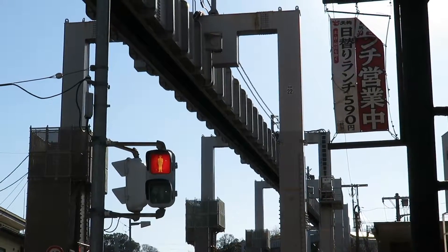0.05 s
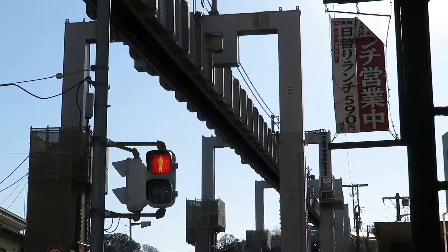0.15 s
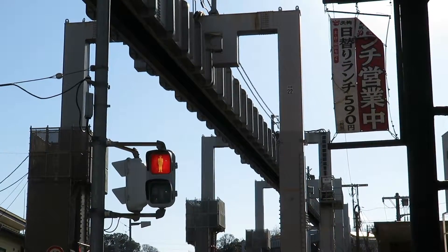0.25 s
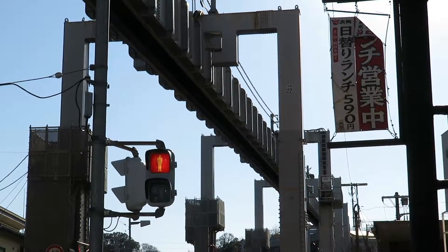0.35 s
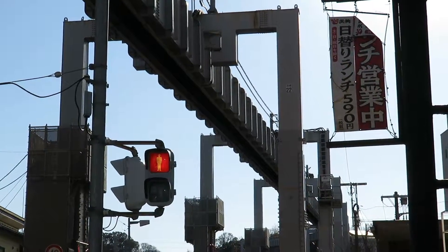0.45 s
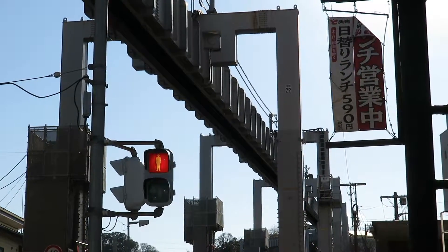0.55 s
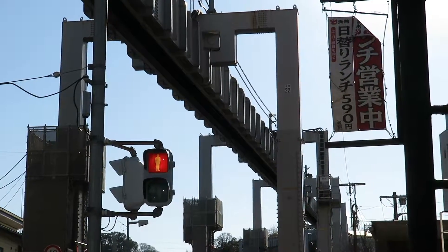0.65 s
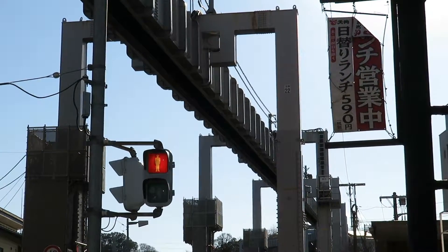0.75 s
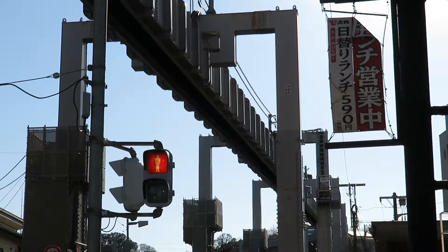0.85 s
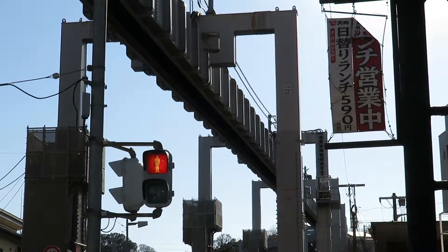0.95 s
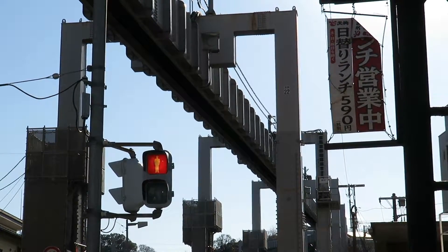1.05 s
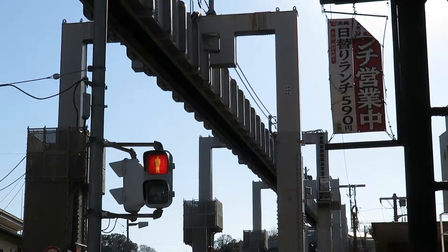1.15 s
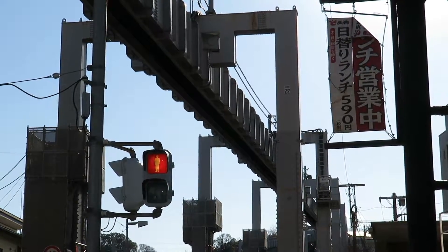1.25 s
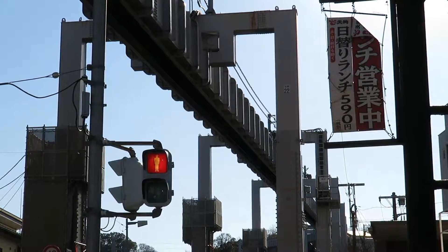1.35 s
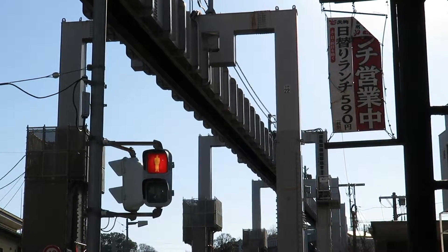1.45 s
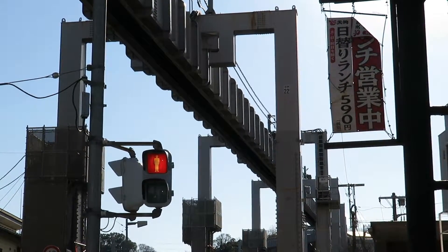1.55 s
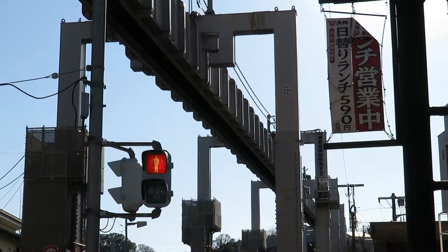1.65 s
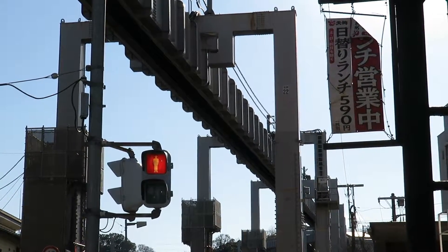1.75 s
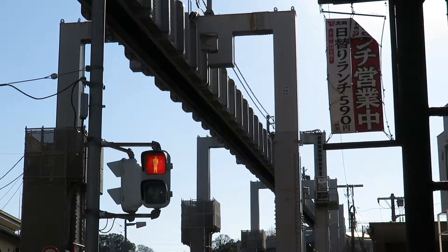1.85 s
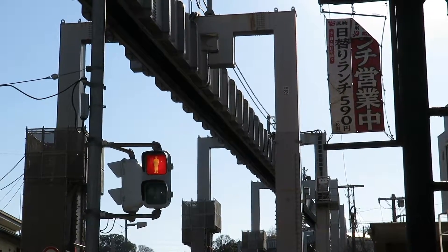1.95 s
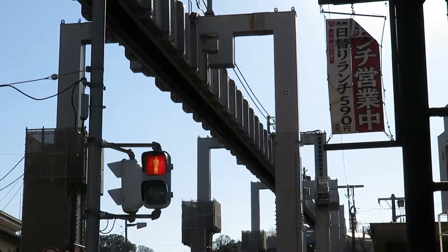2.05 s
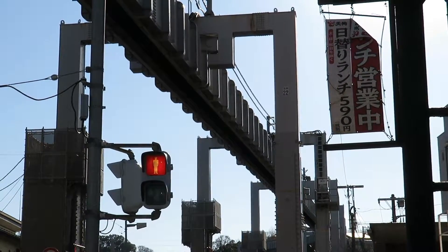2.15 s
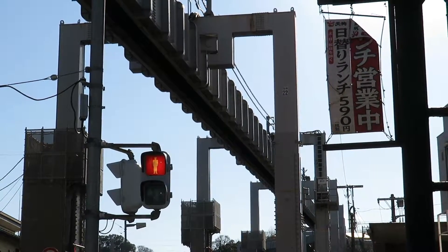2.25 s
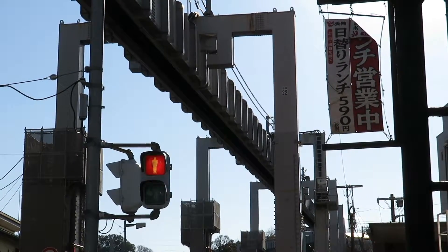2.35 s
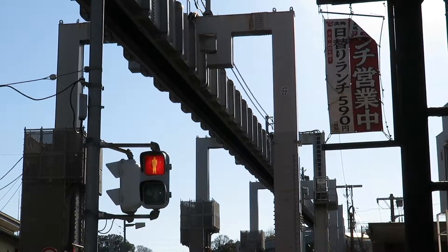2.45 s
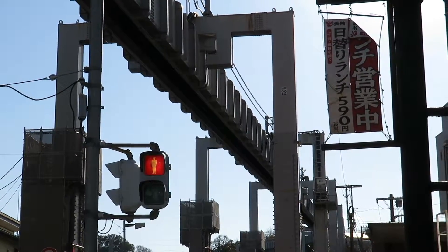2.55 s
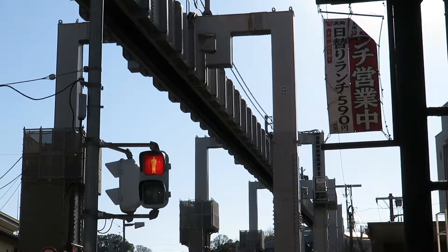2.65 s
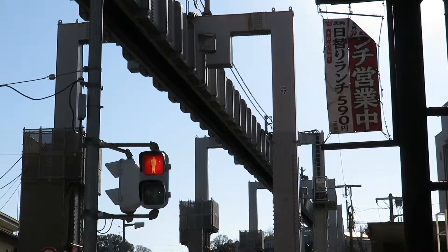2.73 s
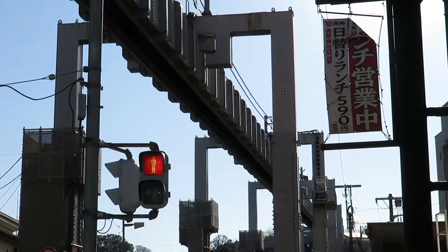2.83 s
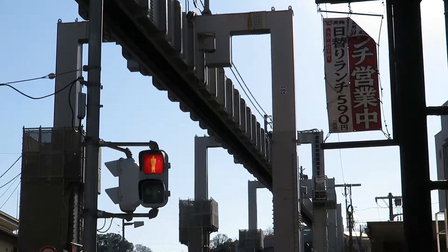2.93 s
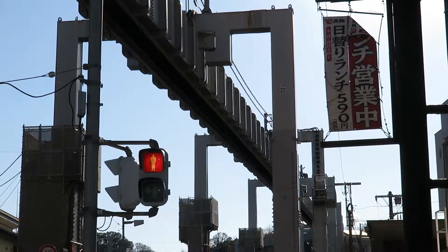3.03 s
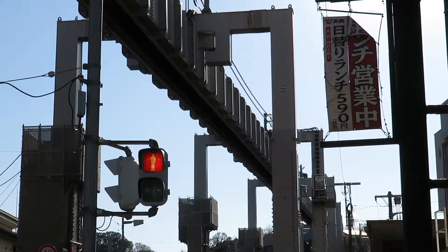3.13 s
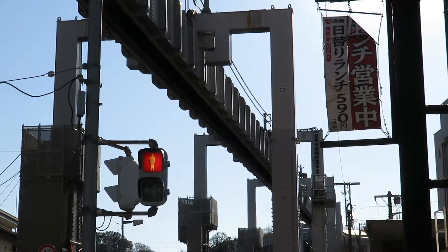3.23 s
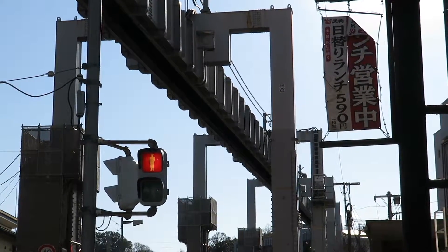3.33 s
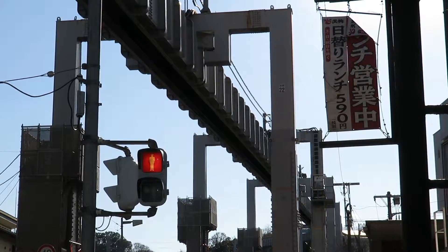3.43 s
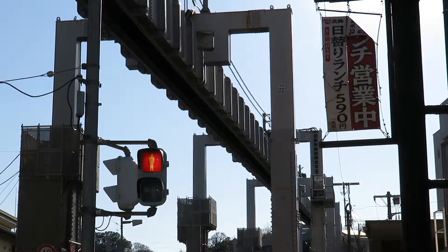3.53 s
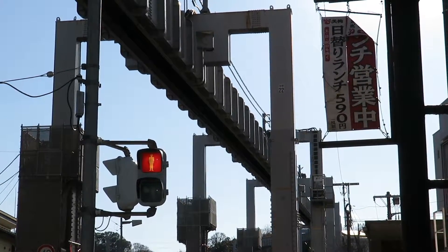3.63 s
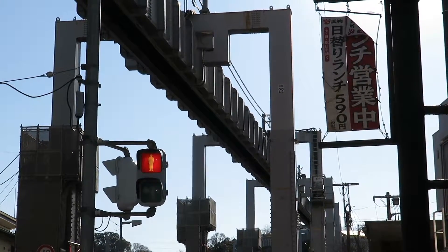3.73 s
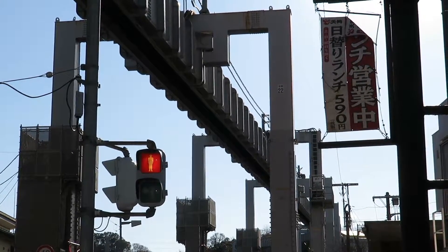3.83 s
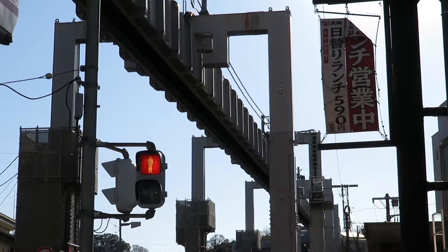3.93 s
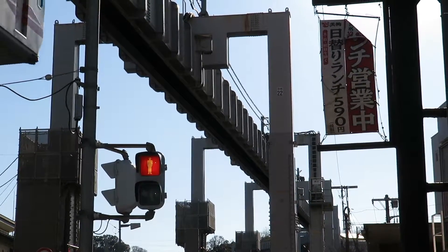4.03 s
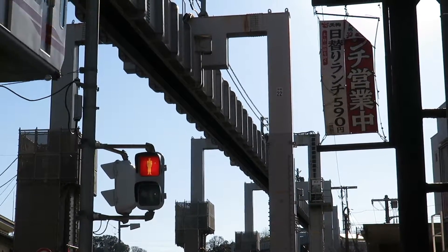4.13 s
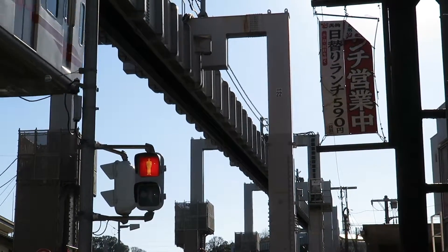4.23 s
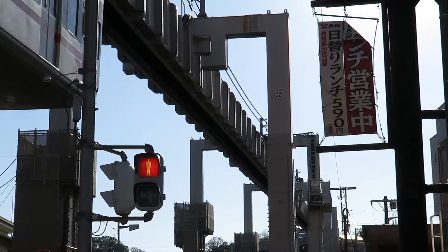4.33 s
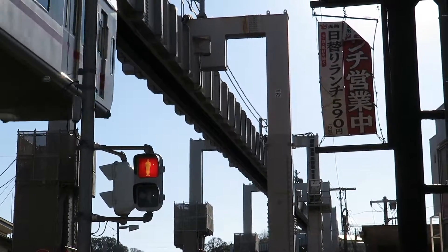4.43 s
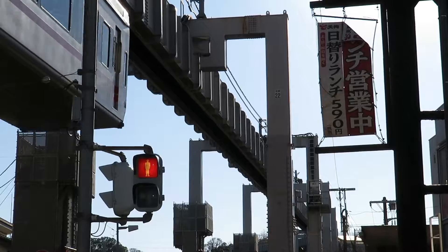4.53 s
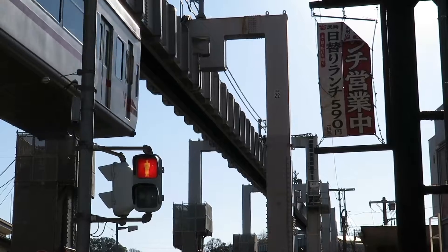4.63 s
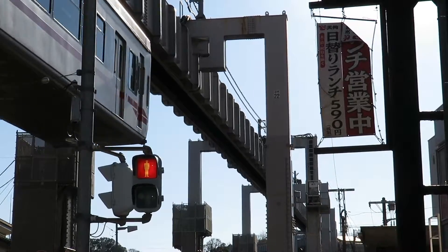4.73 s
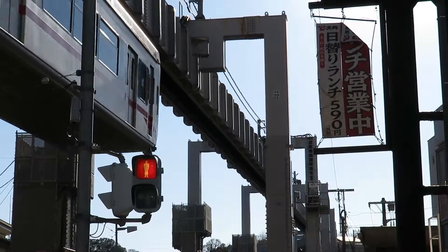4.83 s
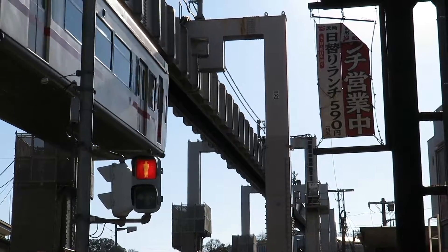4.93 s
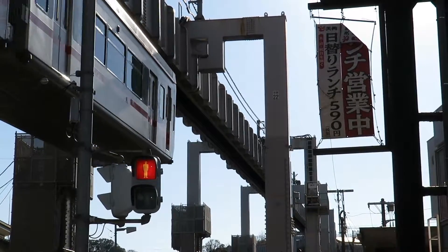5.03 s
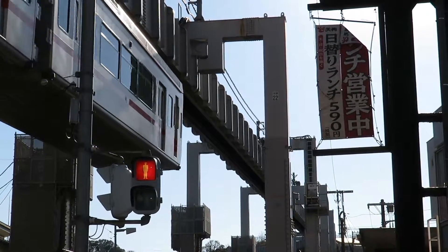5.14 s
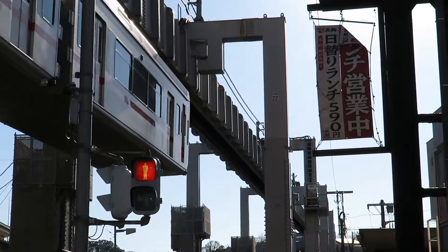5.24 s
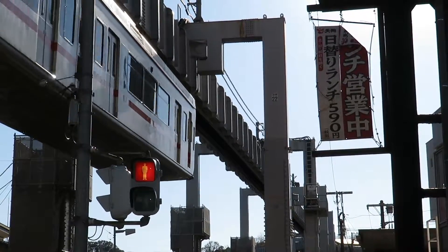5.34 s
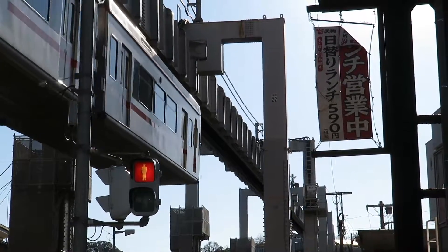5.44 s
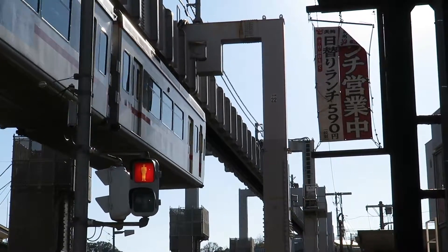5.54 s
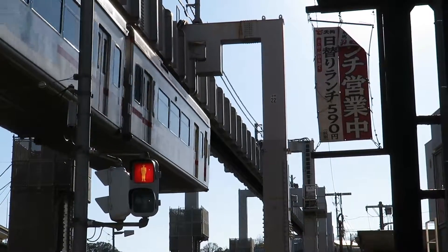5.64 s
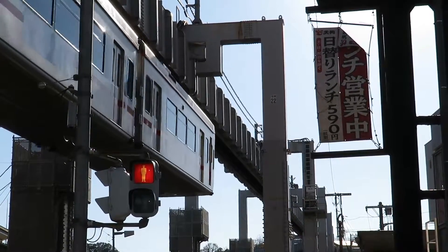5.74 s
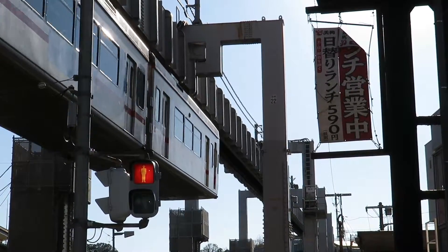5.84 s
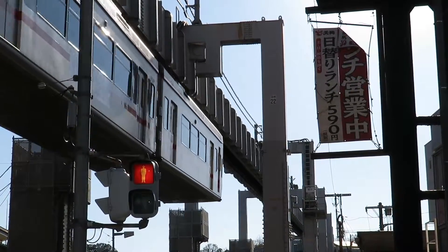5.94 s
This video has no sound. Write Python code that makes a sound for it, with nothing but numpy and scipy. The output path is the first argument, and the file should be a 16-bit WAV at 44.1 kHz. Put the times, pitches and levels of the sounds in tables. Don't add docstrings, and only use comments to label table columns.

```python
import sys
import numpy as np
from scipy import signal
from scipy.fft import rfft, irfft, next_fast_len
from scipy.io import wavfile
from scipy.ndimage import uniform_filter1d, map_coordinates

SR = 44100
rng = np.random.default_rng(int(sys.argv[2]) if len(sys.argv) > 2 else 0)


def to_linear_factor(level_db):
    exponent = np.asarray(level_db, float) / 20
    return 10 ** exponent


def generate_wav(sig):
    pcm = np.round(np.clip(np.atleast_2d(sig).T, -1, 1) * 32767).astype(np.int16)
    wavfile.write(sys.argv[1], SR, pcm)


N = 263718

# [t/s, level/dB]
NEARNESS = [(0, -25.5), (.3, -22.5), (.66, -19), (1.2, -13.5), (1.7, -7), (2.25, -0.5), (2.6, -.5),
            (2.9, 0.5), (3.2, -1), (3.5, 1), (4.0, -1), (4.5, 0.5), (4.8, 0.5), (5.3, 0.5), (5.6, 0),
            (5.98, -1.5)]
# [t/s, share 0-1]
PASSING = [
    (0, 0.14),
    (2.4, 0.09),
    (2.9, 0.44),
    (3.3, 0.57),
    (3.8, 0.62),
    (4.5, .55),
    (5, 0.65),
    (5.5, 0.97),
    (5.98, 1),
]
# [f/Hz, level/dB per Hz]
FIZZ = [(5500, -18), (8000, -3), (9500, 10), (12400, 2), (13400, 0), (14100, -10), (14400, -60)]
# [f/Hz, level/dB per Hz]
SIZZLE_ACROSS = [(4000, -24.5), (5500, -7), (6500, -3), (9000, -1), (10300, -7), (12000, -30)]


def unit(x):
    return x / np.sqrt(np.mean(x ** 2) + 1e-20)


def along(points, hz):
    f, v = np.transpose(points)
    return np.interp(np.log(hz + 1), np.log(f + 1), v)


def curve(rows):
    s, value = np.transpose(rows)
    return np.interp(np.arange(N) / SR, s, value)


def follow(law):
    held_db, grows, gone_db = law
    return held_db + grows * curve(NEARNESS) + gone_db * curve(PASSING)


def wobble(rate):
    knots = rng.standard_normal(int(N * rate / SR) + 4)
    return map_coordinates(knots, [np.arange(N) * rate / SR])


def filtered(x, response):
    m = next_fast_len(N + 8192)
    return irfft(rfft(x, m) * response(np.fft.rfftfreq(m, 1 / SR)), m)[:N]


def coloured(x, spectrum):
    return unit(filtered(x, lambda hz: to_linear_factor(along(spectrum, hz))))


def ringing(x, modes):
    def response(hz):
        power = 0
        for centre, width, db in modes:
            damping = 1j * hz * 1.37 * width
            one = damping / (centre ** 2 - hz ** 2 + damping)
            power = power + to_linear_factor(2 * db) * abs(one) ** 4
        return np.sqrt(power)
    return unit(filtered(x, response))


def patchy(patchy_db):
    z = signal.stft(rng.standard_normal(N + 512), nperseg=512)[2]
    field = uniform_filter1d(rng.standard_normal(z.shape), size=6, axis=0)
    field = uniform_filter1d(field, size=10, axis=1)
    return unit(signal.istft(z * to_linear_factor(patchy_db * unit(field)), nperseg=512)[1][:N])


def train():
    air, slap_db = patchy(patchy_db=1.12), slaps()
    flutter_db = 0.84 * wobble(23)
    body = dulled_treble(beam_drone(air) + tyre_roar(air) + tread_song(air, slap_db))
    tread_db = follow((-32.5, 1.21, -5)) + slap_db + flutter_db
    across_db = 0.37 * slap_db + flutter_db - 0.2
    duck = to_linear_factor(-0.11 * uniform_filter1d(gusts(), size=4000))
    total = duck * (body + to_linear_factor(tread_db) * tread_hiss(air, slap_db))
    return total, duck ** .4 * to_linear_factor(across_db) * port_difference(air)


def beam_drone(air):
    # [f/Hz, width/Hz, level/dB]
    beam_modes = [(555, 250, 0.5), (685, 480, -6.5)]
    # [f/Hz, width/Hz, level/dB]
    low_beam_modes = [(334, 197, 0), (415, 140, -2.5)]
    boom_db = follow((-7.5, -0.09, 7.2))
    drone = ringing(air, beam_modes) + to_linear_factor(boom_db) * ringing(air, low_beam_modes)
    return to_linear_factor(follow((-22, 1.164, 0.1)) - 2.28) * drone


def tyre_roar(air):
    # [f/Hz, width/Hz, level/dB]
    tyre_modes = [(843, 190, 0.5), (1042, 260, 1.5)]
    # [t/s, swell/dB]
    bogies = [(1.45, 1), (1.95, 0), (2.3, -2.5), (2.91, 3), (3.45, 2.5), (3.7, 3.5), (3.9, 1), (4.33, -2.5),
              (4.55, 3), (5.33, 4), (5.85, 3.5)]
    half_width_s = 0.033
    t = np.arange(N) / SR
    swell_db = sum(db * np.exp(-((t - s) / half_width_s) ** 2) for s, db in bogies)
    return to_linear_factor(follow((-19.5, 0.86, -1)) + swell_db - 4.5) * ringing(air, tyre_modes)


def tread_song(air, slap_db):
    # [f/Hz, width/Hz, level/dB]
    song_modes = [(1530, 483, 1), (1798, 480, -2)]
    song_db = follow((-24, 1.04, -0.39)) - 1.96 + 0.11 * slap_db
    return to_linear_factor(song_db) * ringing(air, song_modes)


def tread_hiss(air, slap_db):
    # [f/Hz, level/dB per Hz]
    hiss_spectrum = [(1200, -30), (2200, 1), (3000, -3.5), (4100, -8.5), (5500, -12), (7000, -20.5),
                     (8900, -18), (9800, -52), (12000, -94)]
    # [f/Hz, width/Hz, level/dB]
    whine = (4500, 7.6, -27)
    t = np.arange(N) / SR
    fizz_db = follow((-28.5, 1, 9.7)) + 0.2 * slap_db + 0.63 * wobble(8.0)
    for s, rise_db in ((4.24, 6), (6.1, 3)):
        fizz_db = fizz_db + rise_db * (1 + np.tanh((t - s) / 0.065)) / 2
    hiss = to_linear_factor(-2.0) * dulled_treble(coloured(air, hiss_spectrum))
    return hiss + to_linear_factor(whine[2]) * ringing(air, [whine]) + to_linear_factor(fizz_db) * coloured(air, FIZZ)


def slaps():
    # [t/s, rise of the hiss/dB]
    joints = [(.23, 3), (.34, 6), (.81, 10), (.92, 5), (1.15, 10.5), (1.48, 5), (1.72, 1), (2.1, 5),
              (2.27, -0.5), (2.43, 5.5), (2.61, 10.5), (3.02, 6), (3.5, 6), (3.93, 6.5), (4.17, 5.5),
              (4.45, -0.5), (4.7, 2.5), (5.18, 4), (5.31, 1), (5.46, 7.5), (5.81, 8)]
    dying_s = 0.053
    t = np.arange(N) / SR
    slap_db = np.zeros(N)
    for s, db in joints:
        age = np.clip(t - s, 0, None) / dying_s
        slap_db += db * 1.75 * (1 - np.exp(-5 * age)) * np.exp(-1.5 * age)
    return slap_db


def dulled_treble(x):
    # [f/Hz, level/dB]
    treble_loss = [(3000, 0.5), (6500, 0.5), (8400, -3.5), (9800, -19)]
    near = np.clip(-2.5 + curve(NEARNESS) / 18, 0, 1)
    return near * x + (1 - near) * filtered(x, lambda hz: to_linear_factor(along(treble_loss, hz)))


def port_difference(air):
    # [f/Hz, level/dB per Hz]
    coming = [(900, -53), (1350, -13), (1800, -3), (2600, -2), (3800, 0.5), (4800, -5), (6000, -14),
              (8000, -33)]
    # [f/Hz, level/dB per Hz]
    leaving = [(900, -37), (1350, -11), (1800, -1), (3000, 0), (4400, -5.5), (6000, -14), (8000, -35)]
    # [f/Hz, level/dB per Hz]
    fizz_across = [(9000, -32), (10800, -6), (12600, 2), (14100, -5), (15000, -11), (15800, -26),
                   (17000, -60)]
    # [f/Hz, share 0-1]
    one_way = [(1200, .4), (2200, 1), (3500, 0.86), (7000, 0.96), (9000, .4), (12000, .1)]
    # [f/Hz, turn/radians]
    port_turn = [(1400, 3.6), (3500, 2.8), (6000, 2.2), (10000, 2.1)]
    t, past = np.arange(N) / SR, curve(PASSING)
    direct = filtered(air, lambda hz: along(one_way, hz) * np.exp(1j * along(port_turn, hz)))
    share = 0.9 + (0.32 - 0.9) * past
    arriving = share * direct + np.sqrt(1 - 0.86 * share ** 2) * patchy(patchy_db=1.7)
    abeam_db = 3.5 * np.exp(-((t - 3.73) / 0.34) ** 2)
    hiss = (1 - past) * coloured(arriving, coming) + past * coloured(arriving, leaving)
    sizzle = to_linear_factor(.6 * abeam_db) * coloured(arriving, SIZZLE_ACROSS)
    fizz = to_linear_factor(abeam_db) * coloured(arriving, fizz_across)
    layers = (hiss, (-36.5, 1.07, -1.6)), (sizzle, (-41.5, 1.14, -4)), (fizz, (-42.5, 1.26, -6.5))
    return sum(to_linear_factor(follow(law) + 0.91 * wobble(9)) * layer for layer, law in layers)


def ticks(rows, t60, spectrum):
    t = np.arange(N) / SR
    shape = sum(to_linear_factor(db - 60 * np.clip(t - s, 0, None) / t60) * (t >= s) for s, db in rows)
    return shape * coloured(rng.standard_normal(N), spectrum)


def wind():
    # [f/Hz, level/dB per Hz]
    buffet = [(20, -46), (40, -19.5), (70, -12), (130, -5), (220, -3.5), (310, -2.5), (430, -5), (600, -26),
              (1200, -83)]
    # [t/s, peak level/dB]
    pops = [(.28, -22.5), (0.329, -23), (.59, -23), (0.834, -17), (0.879, -20), (.98, -18.5), (1.003, -29),
            (1.05, -30), (1.096, -25), (3.624, -8), (4.003, -6), (4.14, -9), (4.209, -5), (4.279, -17),
            (5.637, -16), (5.742, -18), (5.869, -14)]
    lump_db = 0.46 * wobble(30) + 0.81 * wobble(16)
    lumps = unit(to_linear_factor(lump_db) * coloured(rng.standard_normal(N), buffet))
    eddies = np.zeros(N)
    for s, db in pops:
        eddies[round(s * SR)] = to_linear_factor(db)
    thump = lambda hz: to_linear_factor(along(buffet, hz / 1.12))
    peak = filtered(np.arange(N) == 0, thump)[0]
    gust_db = follow((-30, .3, 6.3)) + gusts()
    return to_linear_factor(gust_db - 3.0) * lumps + filtered(eddies, thump) / peak


def gusts():
    # [start t/s, hold/s, rise of the buffet/dB]
    gust_rows = [(0, 0.04, 6), (0.298, .04, 3), (0.423, 0.018, 3), (0.566, 0.024, 2.5), (.81, 0.091, 2),
                 (0.983, 0.087, 5), (1.187, 0.023, 1), (1.28, 0.094, -8), (2.274, .1, -3), (1.85, .02, 2),
                 (1.955, .22, 3.5), (2.395, 0.046, 0), (2.6, 0.081, 2.5), (2.97, 0.017, 0),
                 (3.148, 0.13, 3.5), (3.503, 0.066, 5.5), (3.597, 0.036, 10), (3.687, 0.058, 6),
                 (3.82, 0.11, 5.5), (3.982, 0.31, 11), (4.411, 0.065, 7), (4.586, .02, 7), (5.305, .2, 1),
                 (5.59, .06, 5), (5.704, 0.022, 8), (5.813, 0.072, 3)]
    rise_s, fall_s = 0.023, 0.02
    t = np.arange(N) / SR
    gust_db = np.zeros(N)
    for s, hold, db in gust_rows:
        shape = np.minimum(1 + (t - s) / rise_s, 1 + (s + hold - t) / fall_s)
        gust_db += db * np.clip(shape, 0, 1)
    return gust_db


def scene():
    # [t/s, level/dB]
    post_ticks = [
        (.41, -77),
        (.67, -71),
        (.92, -58),
        (1.162, -57),
    ]
    # [t/s, level/dB]
    ticks_across = [
        (1.487, -44),
        (1.668, -54),
        (1.742, -50),
    ]
    total, difference = train()
    total = total + ticks(post_ticks, 0.14, FIZZ) + wind()
    difference = difference + ticks(ticks_across, .04, SIZZLE_ACROSS)
    return np.array([total + difference, total - difference])


def low_pass(x):
    return signal.sosfilt(signal.butter(12, 15800, fs=SR, output="sos"), x)


def record(dry):
    middle = dry.mean(axis=0)
    held = dry / (1 + abs(middle / .95) ** 4) ** (1 / 4)
    return low_pass(held)


dry = scene()
out = record(dry)
generate_wav(out)
```